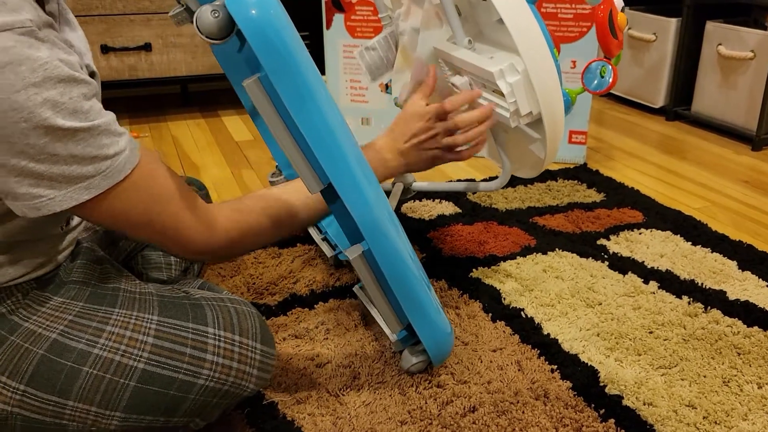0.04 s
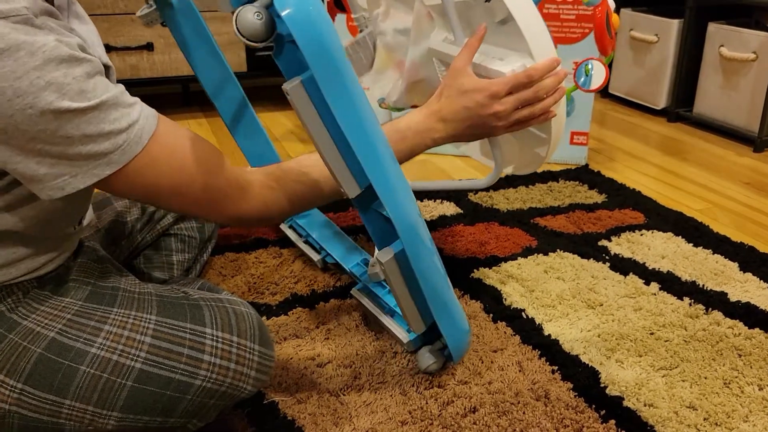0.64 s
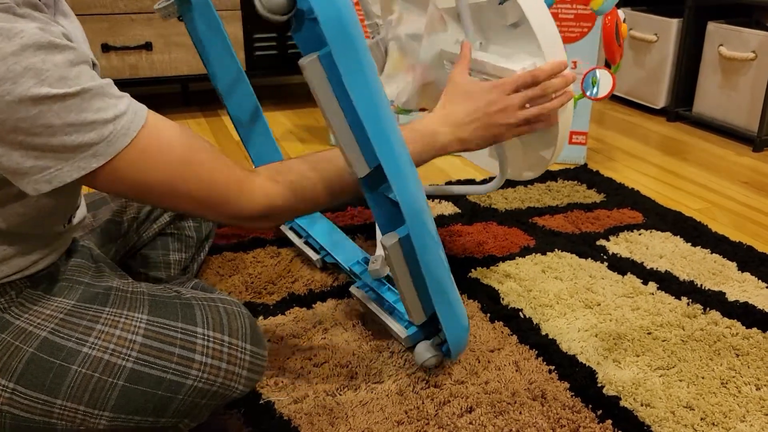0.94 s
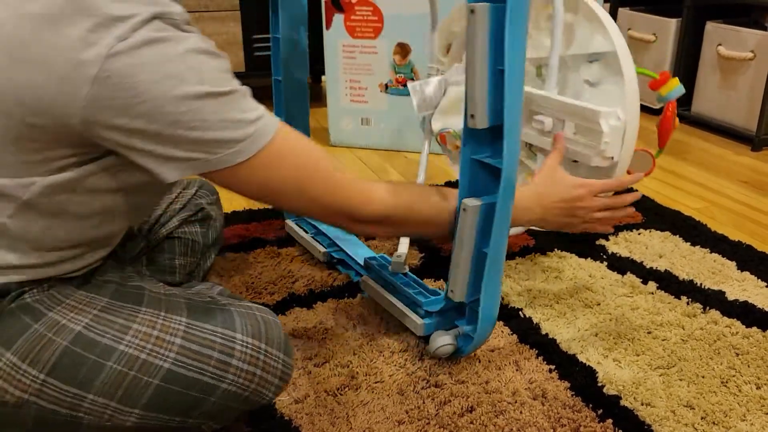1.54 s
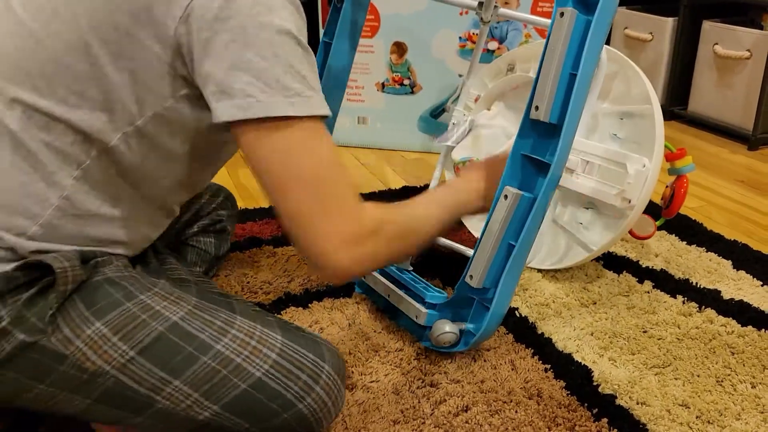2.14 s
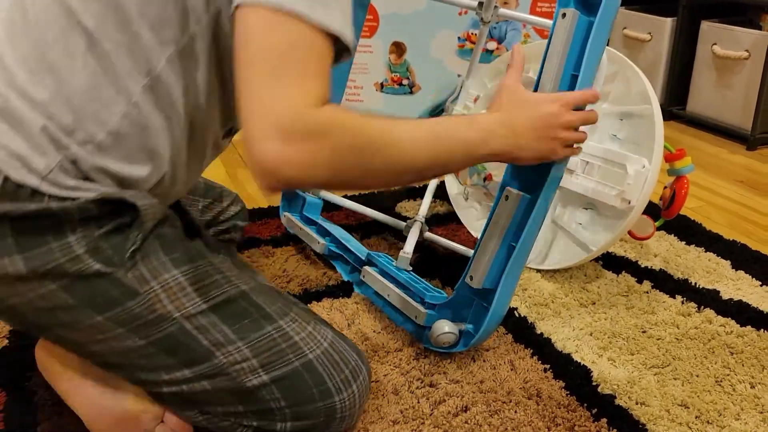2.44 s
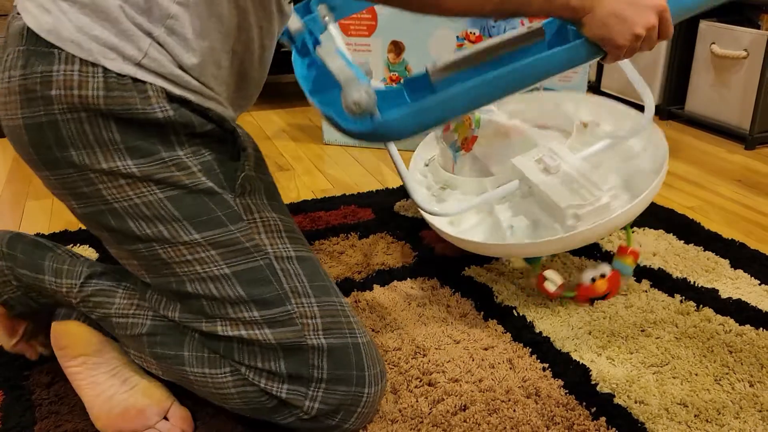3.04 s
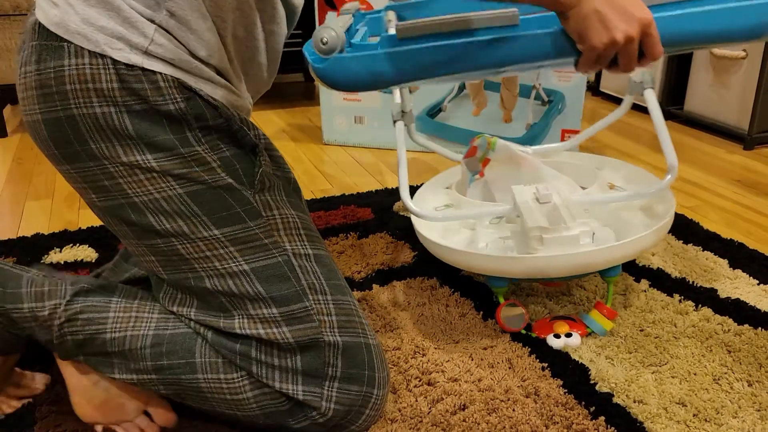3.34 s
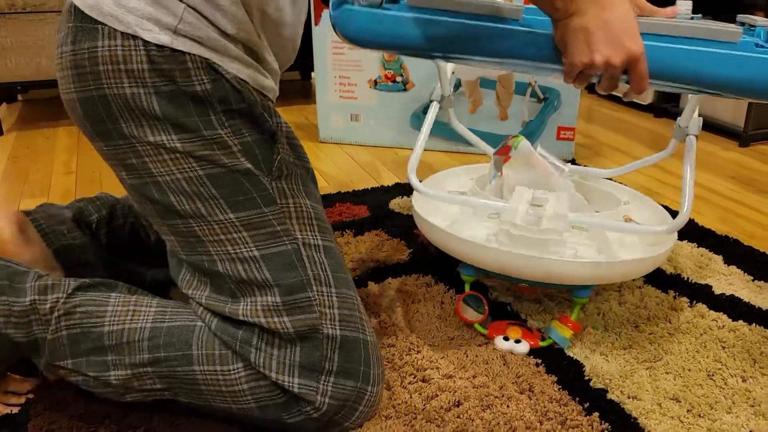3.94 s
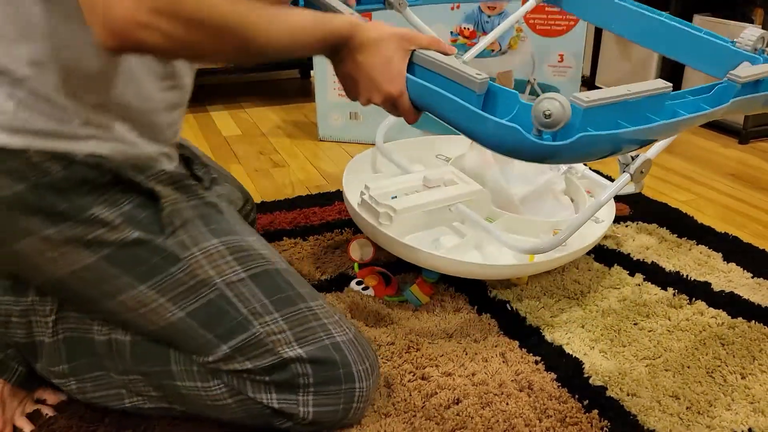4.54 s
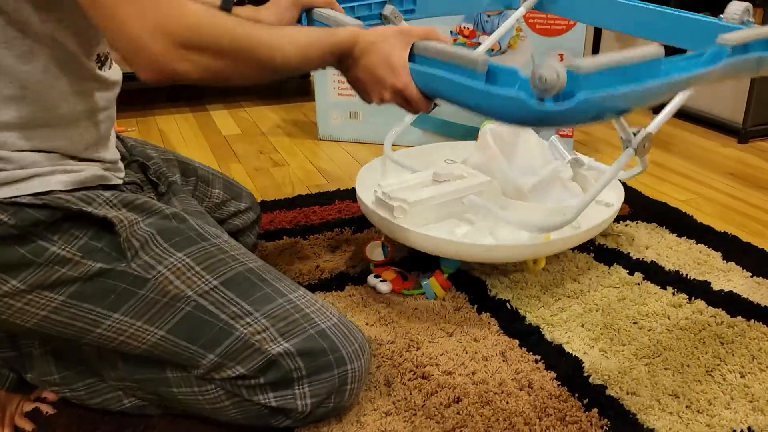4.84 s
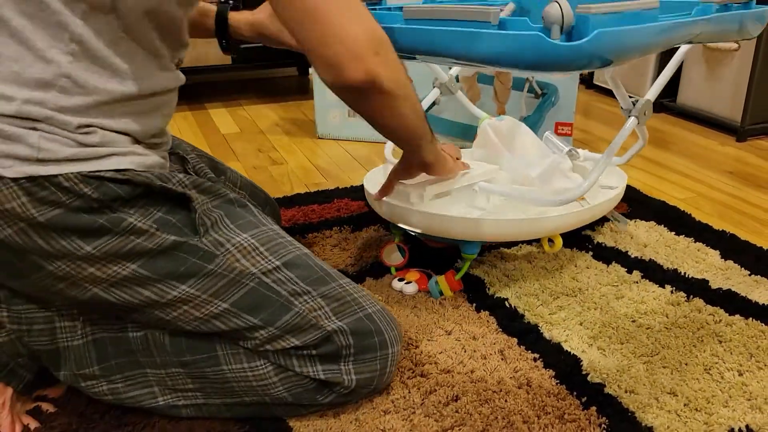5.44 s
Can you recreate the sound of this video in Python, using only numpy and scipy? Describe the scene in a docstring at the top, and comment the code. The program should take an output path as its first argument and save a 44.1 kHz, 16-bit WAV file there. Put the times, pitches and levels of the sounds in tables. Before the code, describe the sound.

A hollow plastic frame snaps, knocks and clatters as it is handled indoors, with light rattling, short scrapes and rustling cloth.

```python
"""A living room: a plastic baby walker is swung open, lifted and turned over on a shaggy rug.
Its latch snaps, hollow shells knock on their steel legs, rims and wheels tap, joints stick and rasp,
loose toys rattle and cloth rustles. The wooden floor thumps under shifting weight and an appliance hums."""
import sys
import numpy as np
from scipy import signal
from scipy.fft import rfft, irfft, next_fast_len
from scipy.io import wavfile
from scipy.ndimage import map_coordinates

SR = 44100
rng = np.random.default_rng(int(sys.argv[2]) if len(sys.argv) > 2 else 0)


def inscribe(sig):
    """Save sig as 16-bit PCM at rate SR to the path in sys.argv[1].

    A 1-D sig is mono; a 2-D sig holds one channel per row.
    Samples are clipped to [-1, 1] before scaling.
    """
    pcm = np.round(np.clip(np.atleast_2d(sig).T, -1, 1) * 32767)
    wavfile.write(sys.argv[1], SR, pcm.astype(np.int16))


N = 246078
TIME_S = np.arange(N) / SR
RING_S = np.arange(SR // 5) / SR  # time axis of one contact

# frame contacts: start_s, shell_db, thud_re_shell_db, snap_re_shell_db
FRAME_BLOWS = [(0.049, -52, 6.5, 8), (0.218, -47.5, 1, -31), (0.332, -28, -5.5, -15.5),
               (0.825, -42, -12, -33), (0.996, -47.5, -4.5, -18), (1.311, -52.5, 2.5, -14),
               (1.338, -45, -9, -6.5), (1.446, -44, -4, -13.5), (1.57, -43.5, 1, -17),
               (1.733, -33, -19, -33), (1.748, -28, -11.5, -47), (1.763, -34, -10, -19),
               (1.862, -27, -5.5, -13), (2.101, -37.5, -19, -28), (2.124, -33.5, -15.5, -28.5),
               (2.464, -25, -18.5, -27), (2.636, -24.5, -25, -30), (2.667, -26, -8, -23),
               (2.689, -21, -13.5, -22), (2.941, -40.5, -5, -26), (3.085, -38, -8, 7),
               (3.338, -33, -3.5, -10.5), (3.496, -25, -5, -21.5), (3.505, -23, -7.5, -36),
               (3.615, -32, -7.5, -31), (3.756, -29, -16, -14), (3.791, -33, -1.5, -36),
               (3.815, -37.5, -5.5, -10.5), (4.164, -34.5, -14, -18), (4.318, -30, -22, -26),
               (4.371, -31, -30, -10), (4.406, -27.5, -3, -35), (4.529, -22, -6.5, -18),
               (4.534, -21.5, -11.5, -49), (5.098, -40.5, -1.5, -64)]
# hollow shell modes: freq_hz, level_db, t60_s
SHELL_MODES = [(247, -5.5, 0.03), (344.5, -5.5, 0.021), (497, -21, 0.24), (780.5, 12, 0.019),
               (922.4, -3, 0.07), (982, -12.5, 0.29), (1270, -3.5, 0.096), (1430, -31, 0.054),
               (1767, -16, 0.073)]
# dense plastic resonances: freq_hz, density_db
PLASTIC_SPECTRUM = [(80, -22.5), (270, -8.5), (480, -10), (850, 2.5), (1300, 4.5), (2000, 7.5), (3500, -6),
                    (5200, -3), (8000, -8), (14000, -18)]
# thud, shell, clack and snap bands: low_hz, high_hz, level_db, swell_s, side_db
BLOW_BANDS = [(79.3, 378, -10, 0.0052, -10.5), (560, 1766, -8.5, 0.0038, 1.5),
              (1452, 3460, -3.5, 0.0034, 2), (3640, 8350, -12, 0.0037, 1.5)]
def frame_blows(modes_db=-9, grip_detune=0.0184, spread_db=6.1):
    """Each contact rings the frame; its hardness and place set the share of thud, clack and snap."""
    out = np.zeros((2, N))
    hz, mode_db, t60_s = np.transpose(SHELL_MODES)[..., None]
    for start_s, shell_db, thud_db, snap_db in FRAME_BLOWS:
        clack_db = -2 + 0.32 * snap_db  # harder contact: more of both
        shares_db = [thud_db, 0, clack_db, snap_db]
        phase = rng.uniform(0, 2 * np.pi, (2, len(SHELL_MODES), 1))
        pitch_hz = hz * (1 + grip_detune * rng.standard_normal(hz.shape))  # the grip bends the shells
        strength = amp(modes_db + mode_db + rng.normal(0, spread_db, hz.shape))
        decay = amp(-60 * RING_S / t60_s)
        modes = np.sum(strength * decay * np.sin(2 * np.pi * pitch_hz * RING_S + phase), axis=1)
        dense = coloured(rng.standard_normal((2, len(RING_S))), PLASTIC_SPECTRUM)
        for (low_hz, high_hz, band_db, swell_s, side_db), share_db in zip(BLOW_BANDS, shares_db):
            age = RING_S / swell_s  # the blow spreads through the plastic, then dies
            ring = modes * (1 - np.exp(-age)) + dense * age * np.exp(1 - age)
            bandpass = signal.butter(3, [low_hz, high_hz], "band", fs=SR, output="sos")
            ring = signal.sosfilt(bandpass, ring)
            ring /= np.std(ring[:, :SR // 80], axis=1, keepdims=True)
            add(out, start_s, ring * amp(shell_db + share_db + band_db) * mid_side(side_db))
    return out


# single-mode contacts: start_s, level_db, pitch_hz, t60_s
CONTACT_TOCKS = [(0.3308, -11.5, 4880, 0.0056), (0.333, -45, 79, 0.35), (0.3317, -20.5, 340, 0.018),
                 (1.42, -25.5, 473, 0.011), (1.578, -32, 287, 0.048), (2.463, -20.5, 777, 0.046),
                 (2.635, -21, 881, 0.044), (3.339, -29.5, 762, 0.057), (3.503, -32, 251, 0.1),
                 (3.506, -30.5, 988, 0.16), (4.372, -22.5, 3390, 0.011), (4.408, -30, 331, 0.11)]
def contact_tocks():
    """Padded contacts, the latch, a steel leg and a joint hitting its stop give short, near-pure notes."""
    out = np.zeros(N)
    for start_s, level_db, pitch_hz, t60_s in CONTACT_TOCKS:
        add(out, start_s, amp(level_db) * ping(pitch_hz, t60_s, attack_s=0.0017))
    return out * mid_side(-6)


# latch and catch releases: start_s, level_db, t60_s, tilt_db_per_octave
LATCH_SNAPS = [(0.050, -54, 0.033, 11), (0.218, -61.5, 0.18, 2), (0.3228, -38.5, 0.048, 0),
               (0.3311, -22, 0.022, -1), (0.826, -45, 0.035, 3.5), (1.687, -25.5, 0.012, 1),
               (2.763, -49, 0.027, 4), (3.085, -39, 0.01, 3.5), (3.161, -32, 0.0083, -0.5),
               (4.782, -41, 0.02, 8)]
# crack before tilt: freq_hz, density_db
CRACK_SPECTRUM = [(200, 7), (600, -1), (1500, 5), (4000, 0), (6000, -4), (10000, -9), (15000, -14)]
def latch_snaps(attack_s=0.0005):
    """A hard catch lets go with a short, broad crack; small catches are brighter."""
    out = np.zeros((2, N))
    rise = 1 - np.exp(-RING_S / attack_s)
    for start_s, level_db, t60_s, tilt in LATCH_SNAPS:
        spectrum = [(hz, db + tilt * np.log2(hz)) for hz, db in CRACK_SPECTRUM]
        crack = coloured(rng.standard_normal((2, len(RING_S))), spectrum)
        add(out, start_s, crack * rise * amp(level_db - 60 * RING_S / t60_s))
    return out


# rims and wheels on the frame: start_s, level_db, pitch_hz
RIM_TAPS = [(0.217, -40, 855), (0.829, -42, 1470), (1.418, -41.5, 850), (1.808, -25.5, 1080),
            (2.124, -23.5, 926), (2.155, -32, 1000), (2.214, -26.5, 1320), (2.375, -44, 955),
            (2.563, -27, 1120), (2.643, -21.5, 1096), (2.942, -33.5, 1150), (3.073, -33, 1760),
            (3.119, -27, 935), (3.293, -37, 816), (3.339, -26.5, 814), (3.507, -30, 1120),
            (3.732, -35.5, 1115), (3.757, -22.5, 1120), (3.847, -29, 1250), (3.888, -26, 1260),
            (4.052, -28.5, 1770), (4.068, -28, 1000), (4.210, -30.5, 1850), (4.562, -20.5, 1170),
            (4.587, -23, 1035)]
# rim modes: pitch_ratio, level_db
RIM_MODES = [(.72, -4.5), (1, 0), (1.37, -8), (2.1, -20)]
def rim_taps(t60_s=0.017, attack_s=0.0012, detune=0.033):
    """A tap rings a few broad modes of a loose plastic rim, which die almost at once."""
    out = np.zeros((2, N))
    for start_s, level_db, pitch_hz in RIM_TAPS:
        for ratio, mode_db in RIM_MODES:
            mode_hz = pitch_hz * ratio * (1 + detune * rng.standard_normal((2, 1)))
            polarity = rng.choice([-1, 1], (2, 1))
            add(out, start_s, amp(level_db + mode_db) * polarity * ping(mode_hz, t60_s, attack_s))
    return out * mid_side(-4)


# legs and seat cloth on plastic: centre_s, length_s, level_db
LEG_SCRAPES = [(0.072, 0.051, -62), (1.697, 0.092, -50.5), (1.87, 0.03, -43.5), (2.681, 0.046, -41.5),
               (3.088, 0.083, -41.5), (3.171, 0.082, -45.5), (3.521, 0.05, -43), (3.823, 0.038, -49.5),
               (4.282, 0.054, -41), (4.94, 0.031, -49)]
# slip noise: freq_hz, density_db
SCRAPE_SPECTRUM = [(300, -7), (1200, 5.5), (2500, 4), (3800, -0.5), (5200, -3.5), (7000, -9.5), (9500, -13),
                   (15000, -18)]
# steel leg modes: freq_hz, level_db, t60_s
STEEL_MODES = [(3354, -4, 0.037), (4770, -9.5, 0.014), (4920, -5.5, 0.021), (5310, -4, 0.022),
               (6630, -7.5, 0.015)]
def leg_scrapes():
    """Hard slides are a dense, bright run of tiny slips that sets the steel legs ringing."""
    pressure = sum(amp(db) * stroke(centre_s, length_s) for centre_s, length_s, db in LEG_SCRAPES)
    slips = coloured(grains(rate_per_s=720, spread_db=4, t60_s=0.01), SCRAPE_SPECTRUM)
    return pressure * through_body(slips, STEEL_MODES, body_db=5)


# sticking joints and rubbed shells: centre_s, length_s, level_db, pitch_hz
JOINT_RASPS = [(4.056, 0.0062, -32.5, 2002), (4.279, 0.008, -39, 6400), (4.284, 0.042, -43.5, 4950),
               (4.298, 0.057, -55, 6670), (4.92, 0.21, -53, 850), (4.921, 0.1, -49, 357),
               (5.105, 0.067, -56.5, 336)]
def joint_rasps(q=8):
    """A quick run of tiny slips keeps one broad resonance sounding, rough and unsteady."""
    out = np.zeros((2, N))
    slips = grains(rate_per_s=900, spread_db=3, t60_s=0.0084)
    for centre_s, length_s, level_db, hz in JOINT_RASPS:
        pressure = stroke(centre_s, length_s)
        ring = pressure * filtered(slips, lambda f: (1j * f * hz / (q * (hz**2 - f**2) + 1j * f * hz)) ** 2)
        ring /= np.linalg.norm(ring, axis=1, keepdims=True) / np.linalg.norm(pressure)
        out += amp(level_db) * ring * mid_side(along(STEREO_WIDTH, hz))
    return out


# briskness of the walker's movement: time_s, level_db
WALKER_MOTION = [(1.25, -79), (1.37, -61), (1.49, -60.5), (1.89, -55.5), (2.12, -49), (2.32, -55.5),
                 (2.5, -68.5), (2.64, -42), (2.88, -56), (3.47, -54), (3.7, -46.5), (3.99, -48),
                 (4.12, -50.5), (4.46, -45.5), (4.66, -51.5), (4.95, -53.5), (5.19, -64.5), (5.58, -66)]
# chatter: freq_hz, density_db
RATTLE_SPECTRUM = [(200, -0.5), (500, -1.5), (850, -2.5), (1300, 4), (2200, -6.5), (3500, -13), (7000, -60),
                   (15000, -50)]
def loose_rattle(level_db=-3.5, jolt_db=-23, rise_s=0.027, settle_t60_s=0.37):
    """Loose joints and toys chatter on the shells, stirred by the motion and jolted by each blow."""
    jolts = np.zeros(N)
    settle = held(0, rise_s, rise_s, settle_t60_s)[:SR]
    for start_s, shell_db, *_ in FRAME_BLOWS:
        add(jolts, start_s, amp(shell_db + jolt_db) * settle)
    shaking = np.hypot(gain_curve(WALKER_MOTION), jolts)
    chatter = coloured(grains(rate_per_s=220, spread_db=3, t60_s=0.05), RATTLE_SPECTRUM)
    return amp(level_db) * shaking * through_body(chatter, SHELL_MODES, body_db=-0.5)


# sleeves, trousers and seat: start_s, length_s, level_db
CLOTH_SLIDES = [(0.56, 0.087, -68.5), (1.678, 0.155, -60.5), (1.949, 0.2, -64.5), (2.476, 0.089, -58),
                (2.652, 0.11, -57.5), (2.905, 0.09, -57.5), (2.991, 0.6, -54), (3.784, 0.041, -61),
                (4.877, 0.14, -63.5), (5.314, 0.16, -71.5)]
# swish: freq_hz, density_db
CLOTH_SPECTRUM = [(500, 5.5), (2000, 1.5), (3500, -1.5), (5100, -2.5), (7000, -6), (10000, -10),
                  (13500, -13), (16000, -24)]
def cloth_rustle(brush_db=-17.5, flutter_db=4):
    """Cloth brushes faintly with the motion and swishes in each slide."""
    slides = sum(amp(db) * held(start_s, length_s, attack_s=0.035, t60_s=0.15)
                 for start_s, length_s, db in CLOTH_SLIDES)
    brushing = amp(brush_db) * gain_curve(WALKER_MOTION)
    flutter = amp(flutter_db * wobble(20.88))
    return np.hypot(brushing, slides) * flutter * coloured(rng.standard_normal((2, N)), CLOTH_SPECTRUM)


# hands and knees on plastic and rug: centre_s, length_s, level_db, pitch_hz
SOFT_RUBS = [(0.634, 0.082, -66, 430), (1.04, 0.055, -61.5, 318), (1.442, 0.073, -53.5, 445),
             (2.956, 0.054, -54, 125), (3.162, 0.16, -43.5, 496), (3.338, 0.13, -48.5, 104),
             (4.48, 0.45, -53, 423), (4.96, 0.27, -51.5, 660)]
def soft_rubs():
    """Sliding hands and knees make a dull, grainy noise around one pitch."""
    out = np.zeros((2, N))
    friction = grains(rate_per_s=220, spread_db=0.5, t60_s=0.13)
    for centre_s, length_s, level_db, hz in SOFT_RUBS:
        spectrum = [(hz / 16, -52), (hz / 4, -26), (hz, 0), (hz * 4, -20), (hz * 32, -60)]
        out += amp(level_db) * stroke(centre_s, length_s) * coloured(friction, spectrum)
    return out


# weight shifts: start_s, level_db
FLOOR_THUMPS = [(0.34, -42), (1.87, -34), (2.13, -46), (4.138, -40), (4.57, -38), (5.13, -45)]
def floor_thumps(pitch_hz=29, t60_s=0.32):
    """The wooden floor gives a slow, deep bounce under the rug."""
    out = np.zeros(N)
    bounce = ping(pitch_hz, t60_s, attack_s=0.028) * (1 - RING_S / RING_S[-1])
    for start_s, level_db in FLOOR_THUMPS:
        add(out, start_s, amp(level_db) * bounce)
    return out * mid_side(-16)


# hum partials: freq_hz, rms_db
HUM_PARTIALS = [(59.4, -59.5), (118.6, -76.5)]
def appliance_hum(drift_rad=0.16):
    """An appliance hums on two slightly unsteady low tones."""
    hum = sum(amp(db) * np.sqrt(2) * np.sin(2 * np.pi * hz * TIME_S + drift_rad * wobble(8.5))
              for hz, db in HUM_PARTIALS)
    return hum * mid_side(-18)


# room air: freq_hz, density_db
AIR_SPECTRUM = [(25, -20), (80, -2.5), (150, -16.5), (300, -13.5), (1000, -30.5), (3600, -38.5),
                (13500, -45), (16000, -46)]
def room_air(level_db=-66):
    """Still air is a faint, steady, low noise."""
    return amp(level_db) * coloured(rng.standard_normal((2, N)), AIR_SPECTRUM)


# room decay: freq_hz, t60_s
ROOM_DECAY = [(150, 0.14), (400, 0.54), (1000, 0.37), (3000, 0.37), (8000, 0.32), (15000, 0.03)]
def room_echo(x, delay_s=0.0034, build_s=0.00042):
    """Walls and furniture answer quickly, differently as the walker moves; the deep bass and the top treble die
    first."""
    out = np.zeros((2, N))
    hop = SR // 5
    for start in range(0, N, hop):
        hz, t, noise = signal.stft(rng.standard_normal((2, SR // 2)), SR, nperseg=256)
        decay = amp(-60 * t / along(ROOM_DECAY, hz)[:, None])
        tail = signal.istft(noise * decay, SR, nperseg=256)[1]
        tail *= 1 - np.exp(-np.maximum(TIME_S[:tail.shape[1]] - delay_s, 0) / build_s)
        piece = x[:, start:start + 2 * hop]
        window = np.sin(np.pi * np.arange(piece.shape[1]) / (2 * hop))
        add(out, start / SR, signal.fftconvolve(piece * window, tail / np.linalg.norm(tail[0]), axes=1))
    return out


# room width: freq_hz, side_re_mid_db
STEREO_WIDTH = [(60, -9), (200, -9), (400, -1), (700, -1), (1300, 3), (4000, 0)]
def coloured(x, spectrum):
    """Shape a mid/side pair by a spectrum and the room's width; mid rms 1."""
    pair = filtered(x, lambda hz: amp([along(spectrum, hz), along(spectrum, hz) + along(STEREO_WIDTH, hz)]))
    return pair / np.std(pair[0])


def through_body(x, modes, body_db):
    """Direct path plus a body's ringing modes; mid rms 1."""
    def response(f):
        ring = sum(amp(db) / (1 + 2j * np.pi * (f - hz) * t60_s / np.log(1000)) for hz, db, t60_s in modes)
        return 1 + amp(body_db) * ring
    pair = filtered(x, response)
    return pair / np.std(pair[0])


def grains(rate_per_s, spread_db, t60_s):
    """Noise cut into tiny contacts of random size."""
    onsets = rng.random(N) < rate_per_s / SR
    contacts = onsets * amp(spread_db * np.clip(rng.standard_normal(N), -2, 2))
    power = signal.fftconvolve(contacts ** 2, amp(-120 * RING_S / t60_s))[:N]
    return np.sqrt(np.abs(power)) * rng.standard_normal((2, N))


def ping(hz, t60_s, attack_s):
    """One damped resonance."""
    return np.sin(2 * np.pi * hz * RING_S) * amp(-60 * RING_S / t60_s) * (1 - np.exp(-RING_S / attack_s))


def stroke(centre_s, length_s):
    """Gaussian swell and fade."""
    return np.exp(-np.minimum((2 * (TIME_S - centre_s) / length_s) ** 2, 30))


def held(start_s, length_s, attack_s, t60_s):
    """Rise, hold and decay."""
    t = TIME_S - start_s
    return np.clip(t / attack_s, 0, 1) * amp(-60 * np.clip((t - length_s) / t60_s, 0, 2))


def wobble(knots_per_s):
    """Smooth random curve."""
    return map_coordinates(rng.standard_normal(int(N * knots_per_s / SR) + 4), [TIME_S * knots_per_s])


def gain_curve(points):
    """(time_s, level_db) points to gain per sample."""
    return amp(np.interp(TIME_S, *np.transpose(points)))


def along(points, hz):
    """Read (freq_hz, value) points on a log frequency axis."""
    freq_hz, values = np.transpose(points)
    return np.interp(np.log(hz + 1), np.log(freq_hz), values)


def filtered(x, response):
    """Apply a frequency response."""
    n = x.shape[-1]
    padded = next_fast_len(n + 8192)
    return irfft(rfft(x, padded) * response(np.fft.rfftfreq(padded, 1 / SR)), padded)[..., :n]


def amp(db):
    """Decibels to gain."""
    return 10 ** (np.asarray(db) / 20)


def mid_side(side_db):
    """Mid and side gains, mid at unity."""
    return amp([[0], [side_db]])


def add(track, start_s, sound):
    """Mix a sound in at start_s."""
    part = track[..., max(round(start_s * SR), 0):][..., :sound.shape[-1]]
    part += sound[..., :part.shape[-1]]


def scene(balance_db=0.5):
    """The frame's front is heard directly; its back rings with other strengths, only off the walls."""
    front = frame_blows() + leg_scrapes() + joint_rasps()
    back = frame_blows() + amp(-4) * latch_snaps()
    near = contact_tocks() + latch_snaps()  # close small parts stay drier
    taps = rim_taps()
    echo = room_echo(amp(-7) * (front + taps) + amp(-15) * near) + room_echo(amp(-6) * back)
    handling = soft_rubs() + loose_rattle() + cloth_rustle() + floor_thumps()
    mid, side = front + near + taps + echo + handling + appliance_hum() + room_air()
    return np.array([mid + side, mid - side]) * amp([[-balance_db], [balance_db]])


def record(dry):
    """Low-pass at the band limit."""
    cutoff_hz, transition_hz = 15850, 400
    return filtered(dry, lambda hz: np.clip((cutoff_hz - hz) / transition_hz + 0.5, 0, 1))


dry = scene()
out = record(dry)
inscribe(out)
```